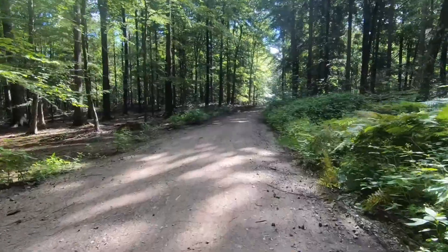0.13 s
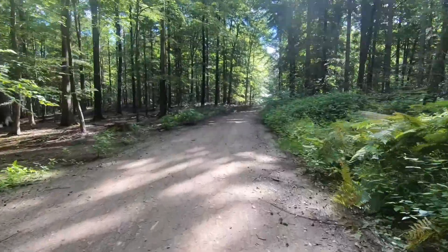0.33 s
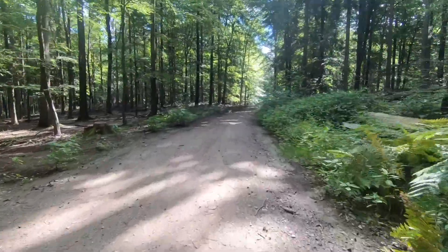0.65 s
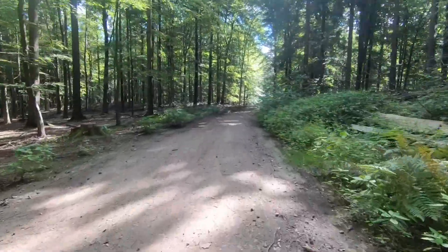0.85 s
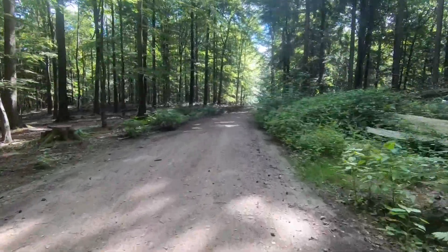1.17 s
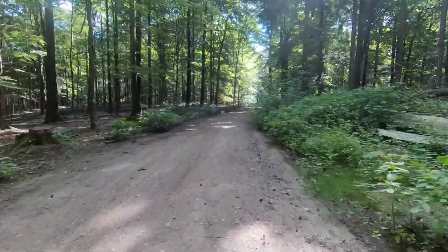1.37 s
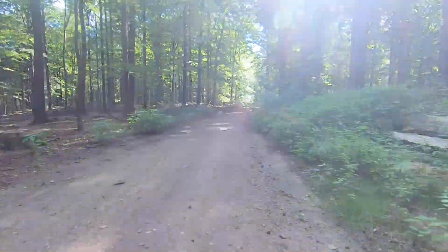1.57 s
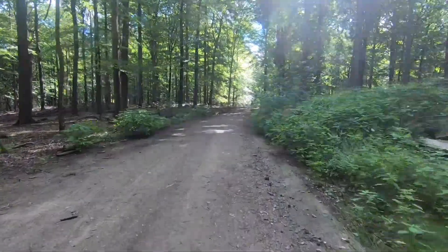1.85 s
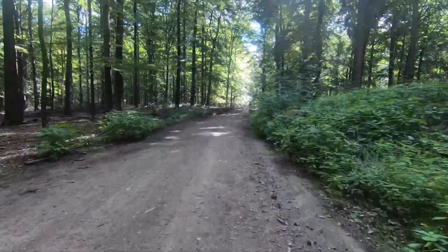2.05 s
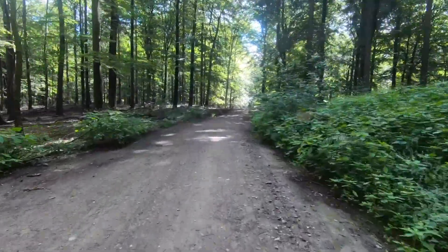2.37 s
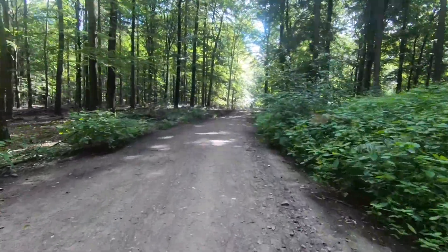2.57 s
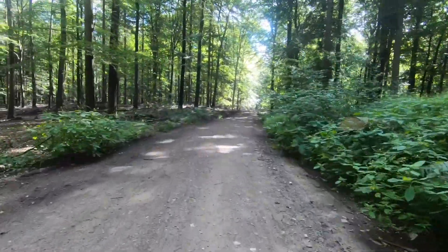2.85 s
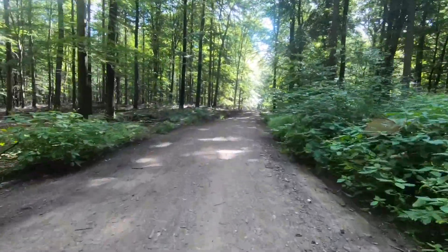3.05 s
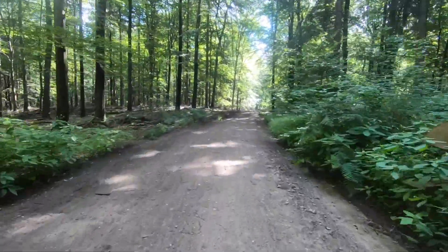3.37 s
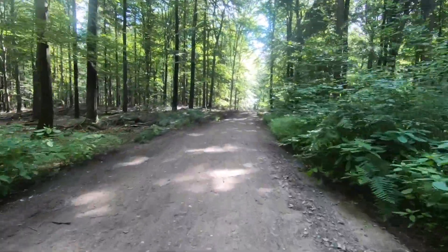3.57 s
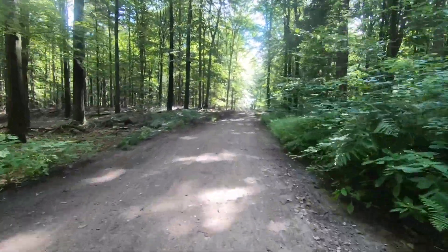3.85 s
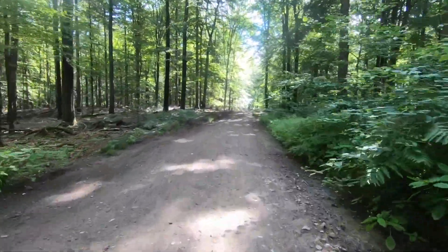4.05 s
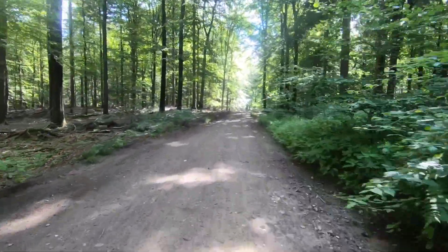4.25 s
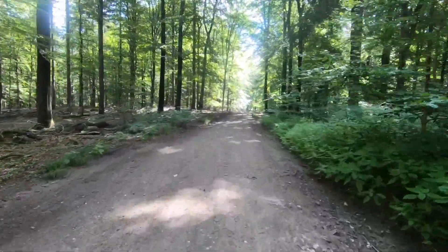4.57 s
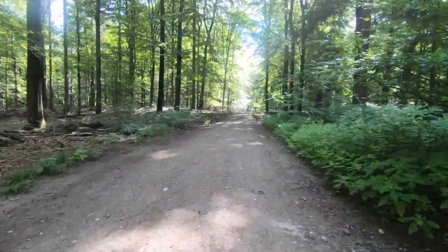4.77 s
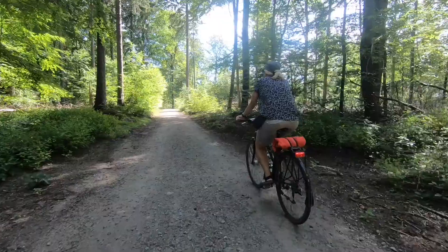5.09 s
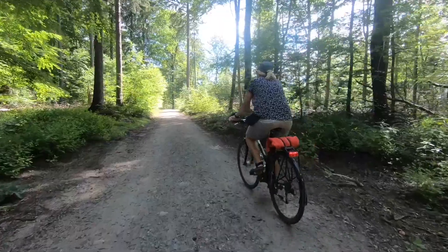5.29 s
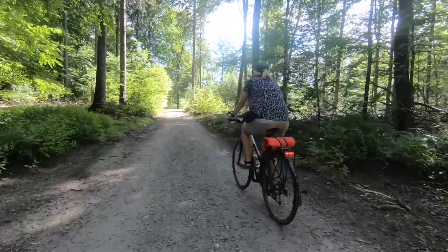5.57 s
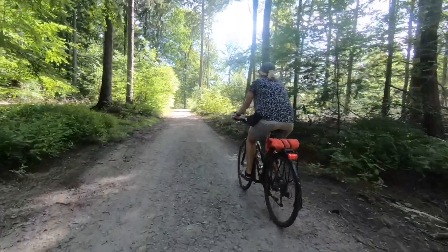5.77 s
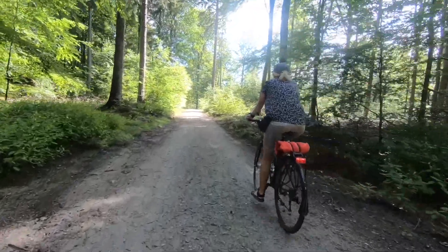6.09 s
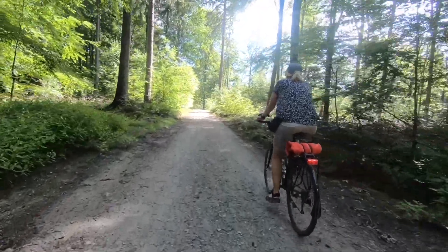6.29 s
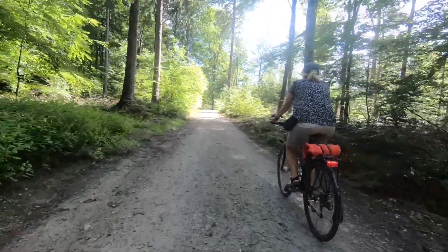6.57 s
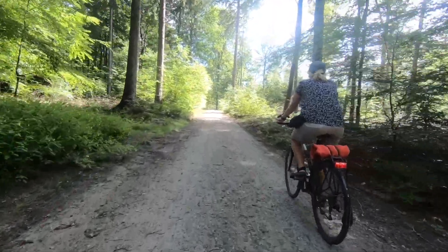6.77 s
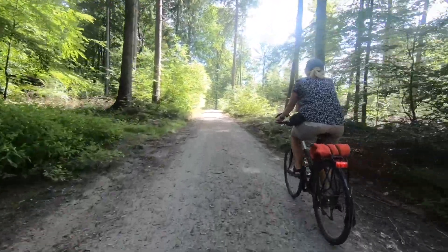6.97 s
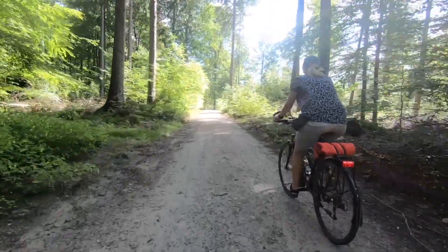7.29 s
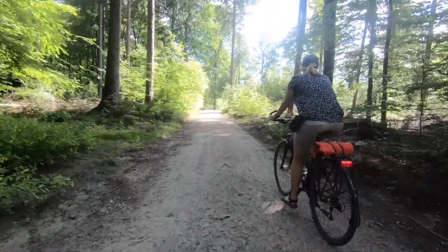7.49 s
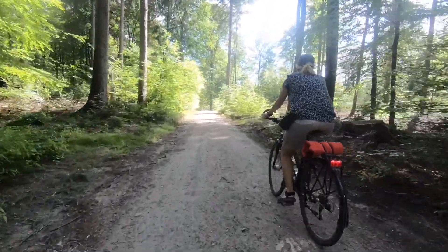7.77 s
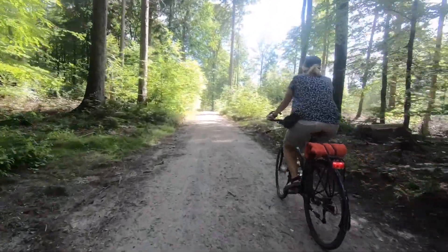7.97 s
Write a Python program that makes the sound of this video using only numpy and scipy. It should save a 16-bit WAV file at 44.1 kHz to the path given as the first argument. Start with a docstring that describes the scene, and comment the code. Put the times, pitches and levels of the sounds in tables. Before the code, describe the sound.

A bike-mounted microphone shakes along a dirt path: low booming sway, hollow frame drumming, gravel grinding under tyres and pebbles cracking. Bumps set off rapid, ringing plastic clacks, densest in the first two seconds, then more scattered. After some gritty spurts and a faint falling hiss, the sound stops abruptly around five seconds. It returns on rougher gravel, with stone knocks, and the rattling is hardest around seven seconds.

```python
"""A gravel track in a forest, ridden by bicycle and heard from a camera fixed to it.
Filtered noise sways the springy mount, drums the frame and buffets the microphone with wind.
Bumps swell the sway and set off short rattles, about a hundred clacks a second, that ring the camera housing.
Noise grains crunch under the tyres; stones knock and ping; grit scrunches, a hiss swishes past, rubber scrapes.
Near 5 s the sound cuts out and fades in on another, coarser stretch of track."""
import sys
import numpy as np
from scipy import signal
from scipy.fft import rfft, irfft
from scipy.io import wavfile
from scipy.ndimage import uniform_filter1d

SR = 44100
rng = np.random.default_rng(int(sys.argv[2]) if len(sys.argv) > 2 else 0)


def persist_wave(psi):
    """Save psi, clipped to +-1, as 16-bit WAV."""
    counts = np.round(np.clip(psi, -1, 1) * 32767).astype(np.int16)
    wavfile.write(sys.argv[1], SR, np.atleast_2d(counts).T)


N = 358974
TIME = np.arange(N) / SR
CUT_S = 5.018  # end of the first stretch of track
RATTLE_HZ = 104  # nominal rate of clacks

# bumps that rattle the mount, levels before trims: (time of the hardest clack [s], its level over 4 ms [dB],
# brightness [dB], sway [dB], build-up [s], rattling on [s])
BUMPS = [(0.021, -35.5, 3, -29, 0.012, 0.043), (0.235, -36.5, 4, -17.5, 0.04, 0.016),
         (0.364, -29.5, 6.5, -18.5, 0.0075, 0.019), (0.456, -25, 9, -15.5, 0.024, 0.024),
         (0.533, -31, 2.5, -19.5, 0.0, 0.00045), (0.7891, -31, 9, -19, 0.00053, 0.01),
         (0.81, -33.5, -1, -26, 0.005, 0.0079), (0.893, -36.5, 4, -20, 0.00088, 0.017),
         (0.939, -34, -1, -24, 0.0038, 0), (0.995, -36, 8, -22.5, 0.027, 0.01),
         (1.107, -35.5, -10, -41, 0.00073, 0.00057), (1.202, -35.5, 10, -20, 0.019, 0.0011),
         (1.234, -31.5, 11, -24, 0.0, 0.013), (1.279, -25, 4.5, -20.5, 0.028, 0.00028),
         (1.332, -29, -4, -19, 0.0015, 0.033), (1.39, -29, 1, -17.5, 0.0092, 0.019),
         (1.461, -37, 10, -37, 0.0014, 0.0032), (1.519, -26.5, 1.5, -15, 0.016, 0.016),
         (1.618, -33, 3, -21.5, 0.014, 0.000055), (1.641, -31, 7, -17, 0.00088, 0.0024),
         (1.683, -32, 6, -14, 0.00031, 0.0096), (1.729, -25.5, 6, -19.5, 0.012, 0.0039),
         (1.763, -32, 9, -20, 0.0077, 0.0), (1.877, -34.5, 4, -23, 0.0016, 0.012),
         (1.915, -37.5, 7, -30.5, 0.00011, 0.0), (1.984, -28.5, 6, -18, 0.03, 0.0059),
         (2.02, -23.5, 5, -15, 0.0055, 0.012), (2.037, -26.5, 5, -21, 0, 0.0093),
         (2.105, -33.5, 2, -15.5, 0, 0.0042), (2.189, -35.5, 7, -22, 0.001, 0.00048),
         (2.2, -33, 2, -20, 0.0023, 0.017), (2.321, -34, 5, -24.5, 0, 0.0022),
         (2.41, -30.5, 2, -24, 0.0, 0.015), (2.629, -30, -7, -29, 0, 0.00077),
         (2.727, -32, -5, -26, 0, 0.0024), (2.736, -36, 1, -23, 0, 0.0011),
         (2.789, -28, 0, -26, 0.0021, 0.002), (2.8247, -31, -1, -17.5, 0.0096, 0),
         (2.877, -28, 0, -22, 0.0027, 0.0068), (2.896, -36, -1, -24, 0, 0.0012),
         (2.901, -33.5, 2, -20, 0.0014, 0.019), (2.939, -37, -3, -24, 0.002, 0),
         (3.005, -34, -3, -38, 0.0019, 0), (3.096, -33, 0, -36, 0, 0.0093),
         (3.142, -32, 9, -20.5, 0.0054, 0.00056), (3.193, -33.5, 0, -36, 0.012, 0.002),
         (3.2325, -23.5, 5, -15.5, 0.0023, 0.001), (3.372, -34, 3, -32, 0.0029, 0),
         (3.408, -36, -1, -42, 0.024, 0.0026), (3.454, -32, 2, -19.5, 0.007, 0),
         (3.527, -31.5, 8, -20.5, 0.014, 0.0062), (3.598, -31, -10, -22.5, 0.0017, 0),
         (3.736, -32, 5, -21, 0.021, 0.0018), (3.782, -36.5, 14, -29, 0.00024, 0.0018),
         (3.846, -34.5, 7, -29, 0.008, 0), (3.863, -30.5, 8, -31, 0.00068, 0.00053),
         (3.873, -25.5, 0, -14, 0.00068, 0.0049), (3.93, -29.5, -10, -20, 0.0035, 0),
         (4.015, -26, 3, -16, 0.0051, 0.0037), (4.089, -33.5, -4, -15.5, 0, 0.0015),
         (4.162, -31, -5, -20, 0.023, 0.0029), (4.317, -33.5, 3, -18.5, 0.0012, 0.00017),
         (4.359, -39, 3, -30, 0.00091, 0.00065), (4.394, -31.5, 18, -17, 0.017, 0.0067),
         (5.324, -28, -5, -22, 0.029, 0.0034), (5.441, -28.5, 6, -37, 0.0018, 0.018),
         (5.498, -28.5, 4, -35, 0.0056, 0.014), (5.537, -25.5, -3, -23, 0.018, 0.024),
         (5.646, -33, 1, -29, 0.0049, 0.0018), (5.667, -30.5, 6, -38, 0.0011, 0.00019),
         (5.731, -28, -18, -17, 0.0021, 0.0022), (5.785, -45, 0, -21, 0.00037, 0.00054),
         (5.833, -32.5, 3, -16, 0, 0.0031), (5.894, -31, 1, -24, 0.004, 0.014),
         (5.954, -30.5, 3, -23.5, 0.0024, 0.01), (5.989, -33.5, 2, -24, 0.0036, 0.0026),
         (6.048, -27, 3, -16.5, 0.0048, 0.0), (6.087, -33, 3, -26, 0.017, 0.00053),
         (6.12, -33, 4, -23, 0.0012, 0.00072), (6.137, -26, 6, -19.5, 0.0064, 0.002),
         (6.287, -31.5, 5, -18, 0.0032, 0.001), (6.336, -33.5, -1, -49, 0.0021, 0.016),
         (6.44, -35.5, -5, -41, 0.0023, 0), (6.524, -36, 3, -24, 0.0016, 0),
         (6.571, -32, 0, -22, 0.0026, 0), (6.646, -29.5, -1, -26, 0.046, 0.0),
         (6.674, -25.5, 4, -23, 0.0023, 0.00085), (6.783, -29, 1.5, -23.5, 0.033, 0.0021),
         (6.812, -31, 9, -16.5, 0.00044, 0.00017), (6.859, -35.5, 2, -22, 0.0014, 0),
         (6.906, -25.5, 2, -22.5, 0.00043, 0.00093), (6.963, -21, -6, -19.5, 0.00093, 0.0017),
         (7.018, -25, 4, -18, 0.00095, 0.0027), (7.0554, -22.5, 1.5, -19.5, 0.011, 0.01),
         (7.086, -23.5, 2.5, -17.5, 0.0001, 0.033), (7.178, -28, -3, -19, 0.0, 0.00096),
         (7.213, -27.5, -2, -15.5, 0.00018, 0.025), (7.285, -30.0, -5, -22, 0.00099, 0.039),
         (7.336, -35, 2, -12.5, 0.0, 0.0013), (7.369, -29, 2, -21, 0.0017, 0.00059),
         (7.378, -27, 5, -18, 0.001, 0.0071), (7.396, -27, 0, -20, 0.00022, 0.012),
         (7.456, -30.5, 1.0, -20.5, 0.0075, 0), (7.514, -26.5, -2, -18.5, 0.0048, 0.00055),
         (7.55, -28.5, 0, -18, 0.0082, 0.00015), (7.623, -31, 3, -24, 0.015, 0.002),
         (7.657, -30.5, -2, -37, 0.0092, 0.00085), (7.695, -28.5, 4, -19, 0.024, 0.014),
         (7.789, -29, 3, -15.5, 0.028, 0), (7.8133, -32, 8, -30, 0, 0.01),
         (7.848, -33, -2, -27, 0.0014, 0.00015), (7.874, -33, -2, -25, 0.00065, 0),
         (7.966, -30, -7, -22, 0.0043, 0.000044), (7.998, -35, -1, -28, 0.00018, 0.0014),
         (8.026, -27.5, 1.5, -16, 0.019, 0.014), (8.098, -32, 0, -42, 0.012, 0.024)]


def undb(db):
    """Decibels to gain."""
    return 10 ** (np.asarray(db) / 20)


def together(*gains):
    """Level in dB of unrelated parts sounding at once: their powers add."""
    return 10 * np.log10(sum(g ** 2 for g in gains))


def unit(x):
    """Scale to rms 1."""
    return x / np.sqrt(np.mean(x ** 2))


def steady(x, seconds):
    """Even out the slow swells of a noise, leaving rms near 1."""
    size = max(int(seconds * SR), 2)
    power = uniform_filter1d(uniform_filter1d(x ** 2, size), size)
    return x / np.sqrt(power + 1e-12)


def colour(points):
    """Causal, minimum-phase impulse response of unit energy, shaped by (frequency [Hz], level [dB]) points."""
    size = 8192
    hz, db = np.transpose(points)
    f = np.maximum(np.arange(size // 2 + 1) * SR / size, 1)
    gain = undb(np.interp(np.log(f), np.log(hz), db))
    # folding the cepstrum onto positive times puts the energy as early as possible
    cepstrum = irfft(np.log(gain))
    cepstrum[1:size // 2] *= 2
    cepstrum[size // 2 + 1:] = 0
    response = irfft(np.exp(rfft(cepstrum)))
    return response / np.linalg.norm(response)


def ring(modes):
    """Decaying sines from (frequency [Hz], width [Hz], level [dB]); neighbours swing in opposite senses."""
    t = TIME[:SR // 25]
    hz, width, db = np.transpose(modes)[:, :, None]
    sense = (-1) ** np.arange(len(modes))
    decay = np.exp(-np.pi * width * t)
    return sense @ (undb(db) * width * decay * np.sin(2 * np.pi * hz * t))


def through(x, response):
    """Pass a sound through a body by convolution."""
    return signal.fftconvolve(x, response)[:N]


def lowpass(x, hz, order=2):
    """Smooth low-pass."""
    return signal.sosfilt(signal.butter(order, hz, fs=SR, output="sos"), x)


def sparse_grains(per_s):
    """Random impulses of random size, at a mean rate per second."""
    return rng.standard_normal(N) * (rng.random(N) < per_s / SR)


def glide(s, hz, hz_per_s, width_hz):
    """Narrow band of noise that slides through hz at time s."""
    age = TIME - s
    phase = 2 * np.pi * (hz + .5 * hz_per_s * age) * age
    slip = lowpass(rng.standard_normal((2, N)), width_hz)
    return unit(slip[0] * np.cos(phase) + slip[1] * np.sin(phase))


def swells(rows):
    """Sum of Gaussian swells: (middle [s], half length as standard deviation [s], level [dB])."""
    return sum(undb(db) * np.exp(-.5 * ((TIME - s) / half) ** 2) for s, half, db in rows)


def jolts(levels_db, linger=1.0):
    """Envelope that swells into each bump and dies away after it, longer for a long rattle."""
    attack_s, release_s = 0.0067, 0.016  # added to the rattle's own build-up and run-on
    power = np.zeros(N)
    for (s, _, _, _, build_s, on_s), db in zip(BUMPS, levels_db):
        near = slice(max(int(s * SR) - SR // 4, 0), int(s * SR) + SR // 4)
        age = TIME[near] - s
        half = np.where(age < 0, attack_s + build_s, linger * release_s + on_s)
        power[near] += undb(db) ** 2 * np.exp(-(age / half) ** 2)
    return np.sqrt(power)


def blows(rows, body, contact_s, grit, patchy_db=2, rise=.14):
    """Each (time [s], level over 4 ms [dB], brightness [dB]) blow has a faint noisy rise, strikes, grates
    and rings the body."""
    level_s, lead, rise_s = .004, 256, .0014  # lead: samples before the strike
    split_hz, detune = 3000, .018
    out, t = np.zeros(N + SR), TIME[:2048] - lead / SR
    f = np.linspace(0, SR / 2, len(t) + 1)
    spots_hz = np.geomspace(700, 12000, num=14)
    contact = np.where(t < 0, rise * np.exp(-abs(t) / rise_s), grit * np.exp(-(t / contact_s) ** 2))
    resonances = rfft(body, 2 * len(t))
    for s, db, bright_db in rows:
        push = (t == 0) + contact * rng.standard_normal(len(t))
        # contact pressure shifts the resonances
        shifted = np.interp(f * (1 + detune * rng.standard_normal()), f, resonances)
        # the spot that is struck favours some of them
        spot_db = patchy_db * np.interp(f, spots_hz, rng.standard_normal(len(spots_hz)))
        treble_db = bright_db * f ** 2 / (f ** 2 + split_hz ** 2)
        spectrum = rfft(push, 2 * len(t)) * shifted * undb(spot_db + treble_db)
        sound = irfft(spectrum)[:len(t)]
        start = max(int(s * SR), 0)
        out[start:start + len(t)] += sound * undb(db) * np.sqrt(level_s * SR) / np.linalg.norm(sound)
    return out[lead:lead + N]


def rumble(track_db, gain_db=-1, bump_db=-0.14, linger=1.38, dip_s=0.011):
    """The track shakes the camera; bumps and dips swing its mount near 55 Hz; gusts buffet an octave higher."""
    # spectra of the shaking, of the mount's deep swing and of the wind: (frequency [Hz], level [dB])
    shake_spectrum = [(12, -36), (20, -4), (42, -0.5), (55, 2.5), (72, -3.5), (118, -3.5), (138, -9.5),
                      (170, -24), (280, -26.5), (600, -50.5), (3000, -100)]
    thud_spectrum = [(12, -30), (20, -6), (44, 0), (56, 7), (70, -3.5), (118, -7.5), (138, -14), (170, -26),
                     (280, -26.5), (600, -49.5), (3000, -100)]
    gust_spectrum = [(30, -15.5), (80, 0.5), (120, 4), (165, -14.5), (230, -22), (400, -22), (900, -55),
                     (3000, -100)]
    # wind on the microphone: (middle [s], half length [s], level [dB])
    gusts = [(3.78, 0.082, -28), (4.15, 0.02, -19), (4.39, 0.034, -19), (4.47, 0.041, -31),
             (5.0, 0.016, -19.5), (7.0, 0.037, -27), (7.8, 0.028, -18), (7.92, 0.047, -19.5),
             (8.04, 0.023, -26)]
    # soft dips in the track that sway the camera without a rattle: (time [s], level [dB])
    soft_dips = [(0.41, -18), (0.69, -20), (1.1, -24), (1.56, -19), (1.83, -29), (1.92, -25), (3.05, -25.5),
                 (3.29, -15), (3.37, -25), (3.67, -19.5), (5.79, -10.5), (6.6, -27), (7.92, -20.5)]
    shake = steady(through(rng.standard_normal(N), colour(shake_spectrum)), .05)
    swing = steady(through(rng.standard_normal(N), colour(thud_spectrum)), .025)
    buffets = steady(through(rng.standard_normal(N), colour(gust_spectrum)), 0.077)
    dips = swells([(s, dip_s, db) for s, db in soft_dips])
    thuds_db = together(jolts(np.array(BUMPS)[:, 3] + bump_db, linger), dips)
    return shake * undb(track_db + gain_db) + swing * undb(thuds_db) + buffets * swells(gusts)


def frame(hum_db, gain_db=1.5, coarse_db=-9, thump_s=0.011):
    """Stones under the tyres drum on the frame, some with a thump; the coarser second stretch adds knocks."""
    # spectra of the drumming frame and of knocks on coarse gravel: (frequency [Hz], level [dB])
    frame_spectrum = [(120, -37.5), (190, -7), (290, -12.5), (330, 1), (385, -1), (440, -9.5), (530, -8.5),
                      (610, -22), (900, -24), (1600, -43), (6000, -99)]
    knock_spectrum = [(130, -20), (230, 0.5), (285, 2.5), (345, -11.5), (490, -2), (650, -21.5),
                      (1200, -31), (5000, -67)]
    # embedded stones thump through the tyre into the frame: (time [s], level [dB])
    thumps = [(0.07, -48), (2.816, -34.5), (3.805, -43), (5.41, -29.5), (5.975, -37), (6.8, -37),
              (7.4, -33.5), (7.61, -39), (7.81, -48)]
    drumming = steady(through(sparse_grains(200), colour(frame_spectrum)), .035)
    knocking = unit(through(sparse_grains(70), colour(knock_spectrum))) * undb(coarse_db) * (TIME > CUT_S)
    thumping = drumming * swells([(s, thump_s, db) for s, db in thumps])
    return (drumming + knocking) * undb(hum_db + gain_db) + thumping


def tyres(crunch_db, smooth_db=-48.0, coarse_db=2):
    """Countless small stones grind under the tread, louder on the coarser second stretch."""
    # spectrum of the grinding gravel: (frequency [Hz], level [dB])
    gravel_spectrum = [(250, -19), (700, 2.5), (1000, 0.5), (1400, -3), (2100, -5.5), (3000, -4),
                       (4700, -8), (5700, -19.5), (6600, -8.5), (7400, -21.5), (8600, -16.5), (9700, -25.5),
                       (11000, -38), (14000, -75.5)]
    grains_per_s, spread_db = 6000, 1.7
    usual_db, follow = -42, .5  # the grinding follows half of the crunch's departure from usual
    grains = sparse_grains(grains_per_s) * undb(spread_db * rng.exponential(size=N))
    db = smooth_db + follow * (crunch_db - usual_db) + coarse_db * (TIME > CUT_S)
    return steady(through(grains, colour(gravel_spectrum)), 0.16) * undb(db)


def pebbles(crunch_db, gain_db=-12, fall_db=-2):
    """Larger bits of gravel crack, each ringing briefly at its own pitch; small ones are higher and weaker."""
    count, low_hz, high_hz, cycles, spread_db = 900, 900, 6000, 2.2, 3
    out, t = np.zeros(N + SR), TIME[:SR // 50]
    for when, small, rarity, damping in rng.random((count, 4)):
        hz, start = low_hz * (high_hz / low_hz) ** small, int(when * N)
        db = fall_db * small - spread_db * np.log(max(rarity, .08))  # a few crack much louder
        decay = np.exp(-t * hz * (.5 + damping) / cycles)
        out[start:start + len(t)] += undb(db) * decay * np.sin(2 * np.pi * hz * t)
    return unit(out[:N]) * undb(crunch_db + gain_db)


def housing(click_db=-5):
    """Response of the camera housing to a clack: a dry click, then its resonances."""
    # resonances: (frequency [Hz], width [Hz], level [dB])
    resonances = [(341, 35.4, 11), (498, 130, 6.5), (830, 860, -7), (1381, 113, 4), (2130, 774, -4),
                  (2440, 316, 0), (3610, 77, -6), (4010, 120, -1.5), (4954, 76, -6.5), (6610, 120, -6),
                  (8240, 61, -11), (9050, 120, -14), (10400, 220, -27.5)]
    # click where the mount meets its stop: (frequency [Hz], level [dB])
    click_spectrum = [(400, -39), (1300, 8.5), (2500, 6), (4700, 4.5), (5800, -7.5), (8700, -6.5),
                      (10500, -18), (14000, -30.5)]
    modes = ring(resonances)
    return modes / np.linalg.norm(modes) + undb(click_db) * colour(click_spectrum)[:len(modes)]


def rattles():
    """Each bump throws the mount against its stops, once per half swing; gives the blows of all clacks."""
    fall_db, scatter_db = 5, 2.5  # clacks weaken away from the hardest one, unevenly
    jitter_s, rate_spread, tone_db = .0007, .045, 2.5
    rows = []
    for s, db, bright_db, _, build_s, on_s in BUMPS:
        before, after = round(build_s * RATTLE_HZ), round(on_s * RATTLE_HZ)
        period_s = (1 + rate_spread * rng.standard_normal()) / RATTLE_HZ
        for k in range(-before, after + 1):
            late, size, tone = rng.standard_normal(3) * (k != 0)  # the hardest clack stays exact
            away = np.sqrt(abs(k) / (1 + (before if k < 0 else after)))
            change_db = min(scatter_db * size - fall_db * away, -fall_db * away / 2)
            when = s + k * period_s + jitter_s * late
            rows.append((when, db + change_db, bright_db + tone_db * tone))
    return np.array(rows)


def clacks(hard, gain_db=-0.35):
    """On bumps the mount hits its stops and rings the housing."""
    return undb(gain_db) * blows(hard, housing(), contact_s=.0012, grit=.19, patchy_db=1.7, rise=.15)


def chatter(hard, crunch_db, gain_db=.5, bright_db=2):
    """Between hard clacks the mount keeps swinging and ticks lightly at each end of its swing."""
    jitter_s, scatter_db, tone_db, ceiling_db = .0012, 5, 4, -36.5
    edges = np.sort(np.r_[0, hard[:, 0], TIME[-1]])
    times = []
    for a, b in zip(edges, edges[1:]):
        swings = max(round((b - a) * RATTLE_HZ), 1)
        times.extend(np.linspace(a, b, swings + 1)[1:-1])
    times = np.array(times)
    late, size, tone = rng.standard_normal((3, len(times)))
    db = np.minimum(np.interp(times, TIME, crunch_db) + gain_db + scatter_db * size, ceiling_db)
    rows = np.column_stack([times + jitter_s * late, db, bright_db + tone_db * tone])
    return blows(rows, housing(), contact_s=.0015, grit=.3, patchy_db=3)


def stones():
    """Flicked stones knock on the bicycle; a few pebbles ping as decaying sines."""
    # knocks: (time [s], level over 4 ms [dB], brightness [dB])
    knocks = [(4.994, -30, 3), (5.2405, -34, -34), (5.381, -37, 16), (5.3828, -22.5, -18),
              (5.3845, -39, -26), (5.4062, -29, 13), (5.409, -29, -38)]
    # spectrum of a knock: (frequency [Hz], level [dB])
    stone_spectrum = [(150, -25), (420, 1), (600, -4), (850, 1), (1400, 1), (2400, -1), (4200, -10),
                      (6000, -21), (8600, -19), (10000, -34), (14000, -52)]
    # pebbles pinging out from under the tyre: (time [s], frequency [Hz], level [dB])
    pings = [(0.322, 2092, -37), (1.379, 2283, -31), (4.354, 3043, -43)]
    ping_s = .003
    out = blows(knocks, colour(stone_spectrum), contact_s=.0012, grit=.06, patchy_db=0, rise=.07)
    for s, hz, db in pings:
        age = np.maximum(TIME - s, 0)
        out += undb(db) * np.exp(-age / ping_s) * np.sin(2 * np.pi * hz * age)
    return out


def scrunches(split_hz=3000):
    """Spurts of loose grit ring the wheel; fine grit is bright, coarse grit dull."""
    # spurts: (middle [s], half length [s], level [dB], brightness [dB])
    spurts = [(4.379, 0.0034, -44, 13), (4.551, 0.01, -49, 14.5), (4.605, 0.0093, -32, -8),
              (4.663, 0.01, -32, -4.5), (4.704, 0.0047, -37, -6), (4.732, 0.006, -35, 2),
              (4.792, 0.0044, -37, -11), (4.838, 0.0052, -43, -8), (7.175, 0.0025, -43, -9)]
    # spectrum with the wheel's resonances: (frequency [Hz], level [dB])
    scrunch_spectrum = [(250, 1), (380, 6), (520, -0.5), (900, -9), (1140, 0), (1300, -12), (1540, 0),
                        (2300, -12), (3500, -7), (3840, -4), (4200, -11), (5100, -7), (6400, -18),
                        (7500, -12.5), (8800, -22), (9700, -27), (14000, -42.5)]
    grit = steady(through(sparse_grains(4000), colour(scrunch_spectrum)), .02)
    dull = lowpass(grit, split_hz, order=1)
    body = swells([(s, half, db) for s, half, db, _ in spurts])
    treble = swells([(s, half, db + bright_db) for s, half, db, bright_db in spurts])
    return dull * body + (grit - dull) * treble


def swish(db=-50.0, echo_db=-2, band_db=-53.0, band_hz=1800, slide_hz_per_s=-800):
    """A soft, fluttering hiss slides down in colour as its reflection lags ever more; a narrow band falls too."""
    # spectrum of the hiss: (frequency [Hz], level [dB])
    swish_spectrum = [(300, 7), (1100, 3), (1800, -9.5), (2500, -2.5), (5500, -10), (8000, -13.5),
                      (10000, -29.5), (14000, -41)]
    middle_s, half_s, width_hz = 4.64, .15, 260
    lag_s, drift = .00054, .0004  # the reflection's lag at the middle, and its growth per second
    flutter_hz, flutter_db = 60, 3
    flutter = undb(flutter_db * unit(lowpass(rng.standard_normal(N), flutter_hz)))
    hiss = through(rng.standard_normal(N), colour(swish_spectrum)) * flutter
    echo = np.interp(TIME - lag_s - drift * (TIME - middle_s), TIME, hiss)
    band = glide(middle_s, band_hz, slide_hz_per_s, width_hz)
    sound = undb(db) * (hiss + undb(echo_db) * echo) + undb(band_db) * band
    return sound * swells([(middle_s, half_s, 0)])


def scrapes(rise_hz_per_s=3000, width_hz=35):
    """The tyre's side sticks and slips on a stone: a rough, narrow tone that climbs."""
    # chirps: (middle [s], half length [s], frequency [Hz], level [dB])
    chirps = [(6.724, 0.015, 1149, -45), (6.752, 0.016, 1350, -45)]
    out = np.zeros(N)
    for s, half, hz, db in chirps:
        tone = steady(glide(s, hz, rise_hz_per_s, width_hz), 0.02)
        out += tone * swells([(s, half, db)])
    return out


def scene(hum_db=-4.5, crunch_db=-1.0, bump_hum_db=-22, hum_follow=0.47, bump_crunch_db=-12):
    """All parts of the moving bicycle, heard from the camera; every bump lifts the hum and the crunch."""
    # the track between bumps, before trims: (time [s], camera sway [dB], frame hum [dB], gravel crunch [dB])
    track = [(0.0, -17.5, -36.5, -43), (0.131, -28.5, -40, -55), (0.45, -27.5, -45, -46.4),
             (0.62, -27, -40, -55), (0.85, -28.5, -45, -57), (1.1, -25, -40.5, -51), (1.35, -39, -34, -49),
             (1.7, -29, -30, -41), (1.85, -20.5, -38.5, -48.5), (2.05, -31, -36, -54),
             (2.15, -31.5, -42, -53), (2.3, -23.5, -39, -51.5), (2.6, -27, -37, -48.5),
             (2.9, -23, -39, -49.5), (3.22, -23, -30.5, -41), (3.4, -26.5, -40.5, -49.5),
             (4.25, -22, -32.5, -45.5), (4.5, -26, -46, -53.5), (4.95, -26.5, -47.5, -53),
             (5.3, -19, -38, -46), (5.55, -16.5, -38, -47), (5.9, -26, -35.5, -43), (6.45, -26, -36.5, -50),
             (6.9, -23, -38, -44), (7.3, -31.5, -40, -52), (8.14, -22.5, -39, -45.5)]
    s, *columns = np.transpose(track)
    sway, hum, crunch = (np.interp(TIME, s, c) for c in columns)
    strength = np.array(BUMPS)[:, 1]
    hum = together(undb(hum + hum_db), jolts(hum_follow * strength + bump_hum_db))
    crunch = together(undb(crunch + crunch_db), jolts(strength + bump_crunch_db, linger=0.68))
    rolling = rumble(sway) + frame(hum) + tyres(crunch) + pebbles(crunch)
    passing = stones() + scrunches() + swish() + scrapes()
    hard = rattles()
    rattling = lowpass(clacks(hard) + chatter(hard, crunch), 11300, order=3)
    return (rolling + passing + rattling)[None]


def record(dry, ceiling=0.88):
    """The camera rounds the loudest peaks, pauses between two stretches of track and cuts the top."""
    resume_s, fade_s, top_hz = 5.188, .05, 14500
    first = np.clip((CUT_S - TIME) * 2000, 0, 1)  # closes within half a millisecond
    second = np.clip((TIME - resume_s) / fade_s, 0, 1) ** 2
    sound = ceiling * np.tanh(dry / ceiling) * (first + second)
    return signal.sosfilt(signal.ellip(8, .2, 70, top_hz, fs=SR, output="sos"), sound)


dry = scene()
out = record(dry)
persist_wave(out)
```